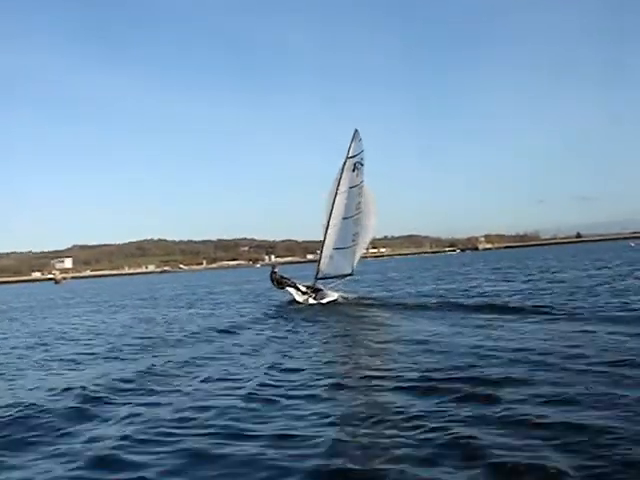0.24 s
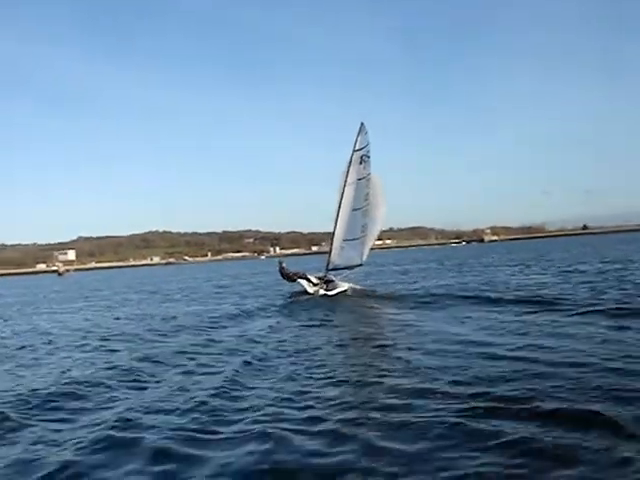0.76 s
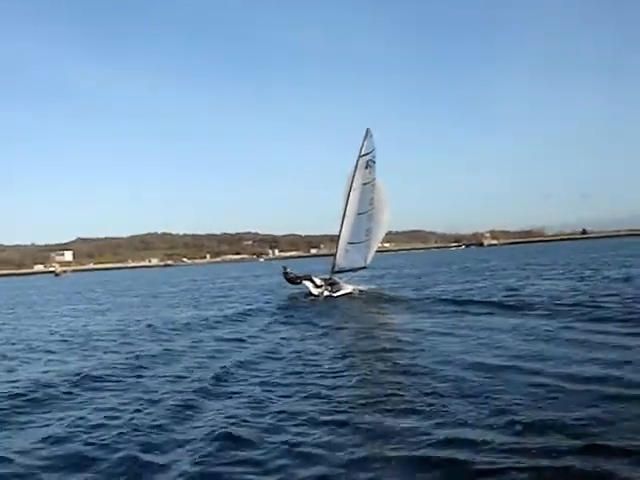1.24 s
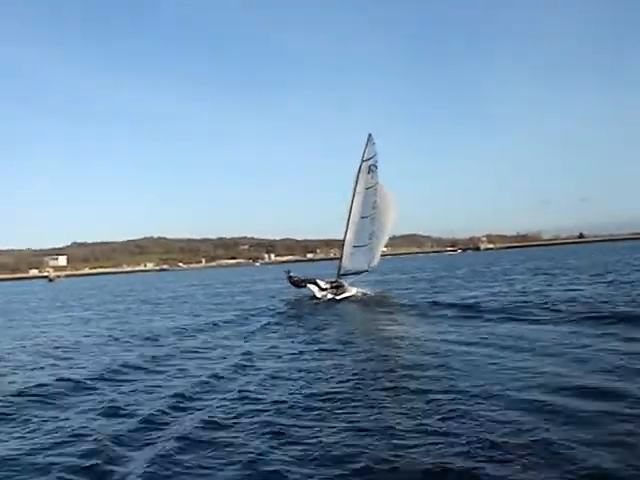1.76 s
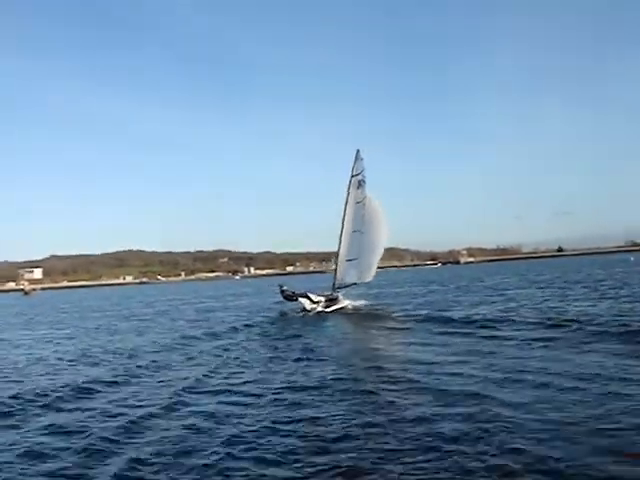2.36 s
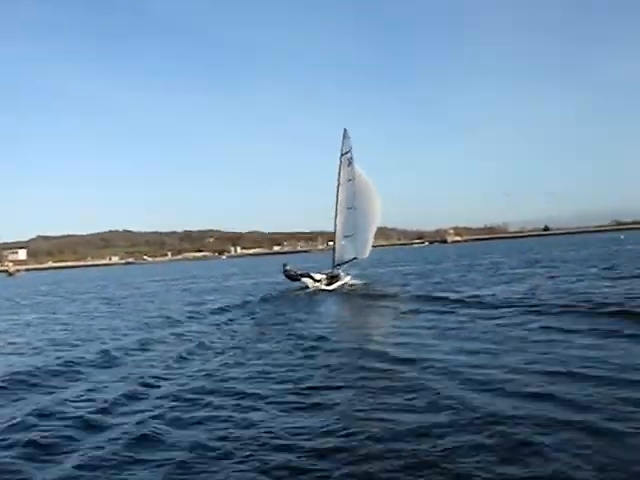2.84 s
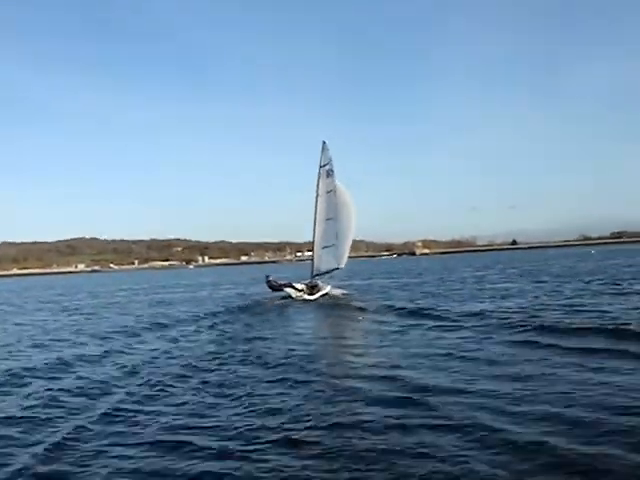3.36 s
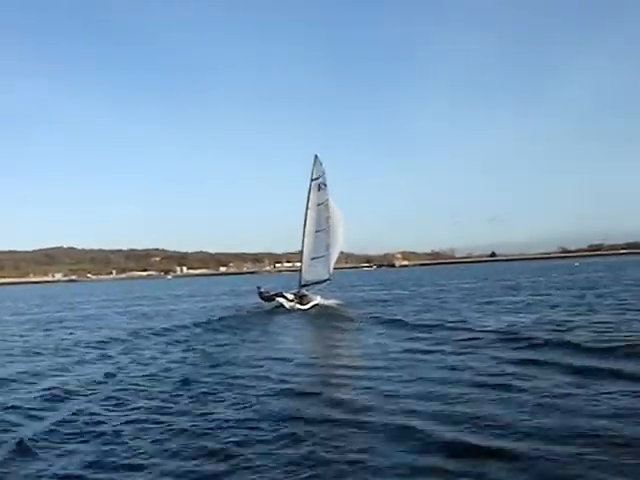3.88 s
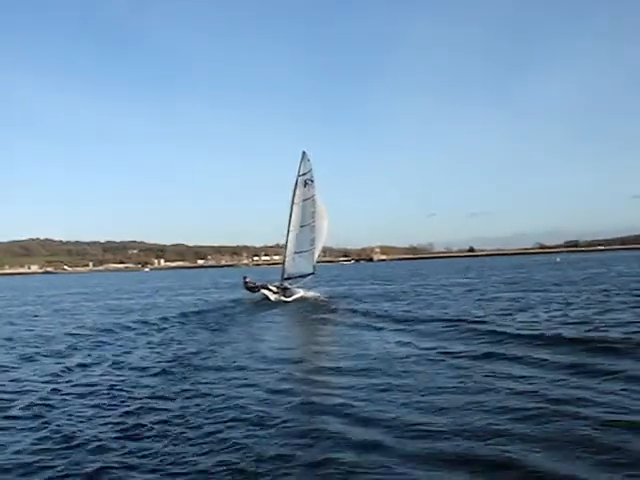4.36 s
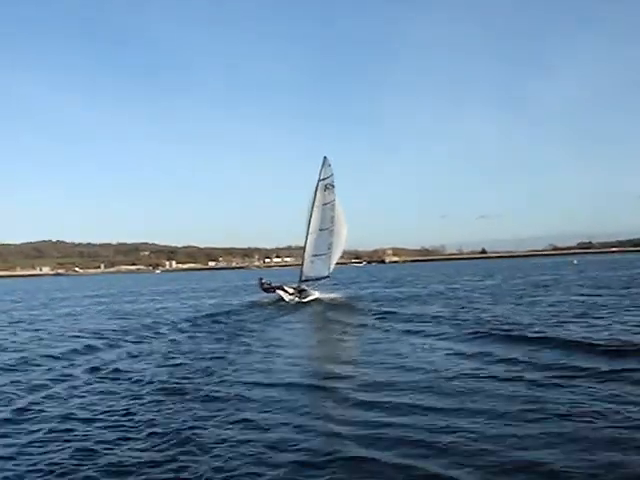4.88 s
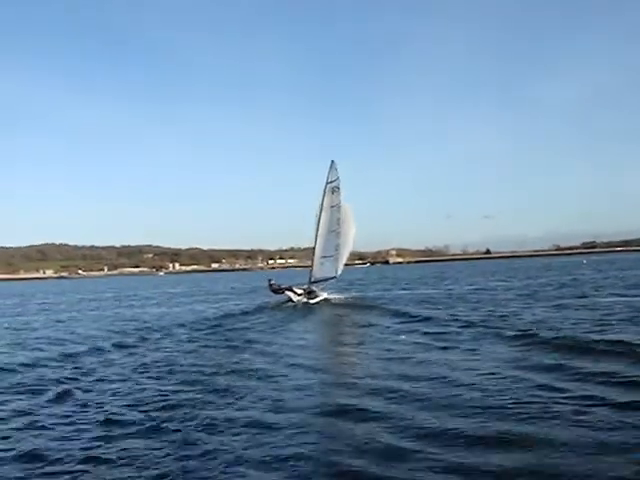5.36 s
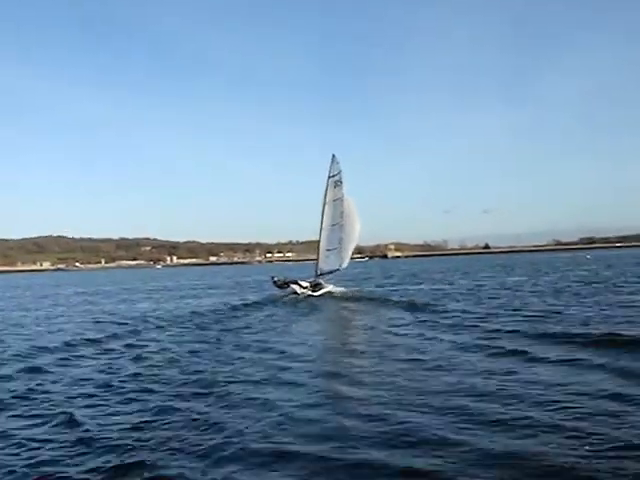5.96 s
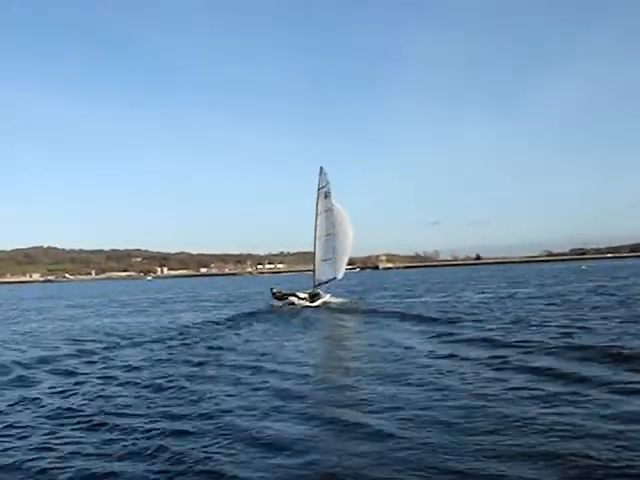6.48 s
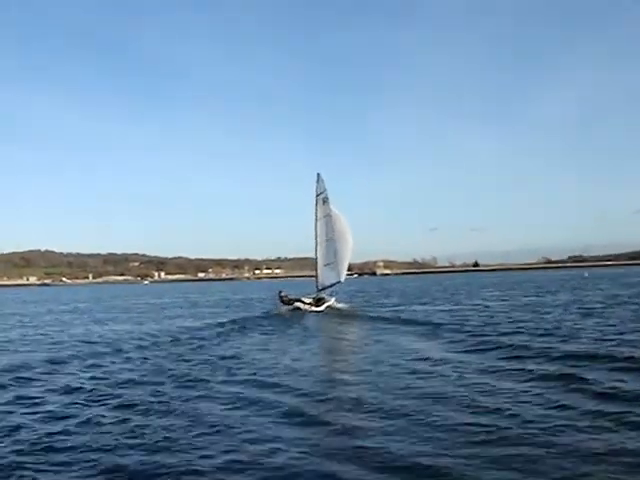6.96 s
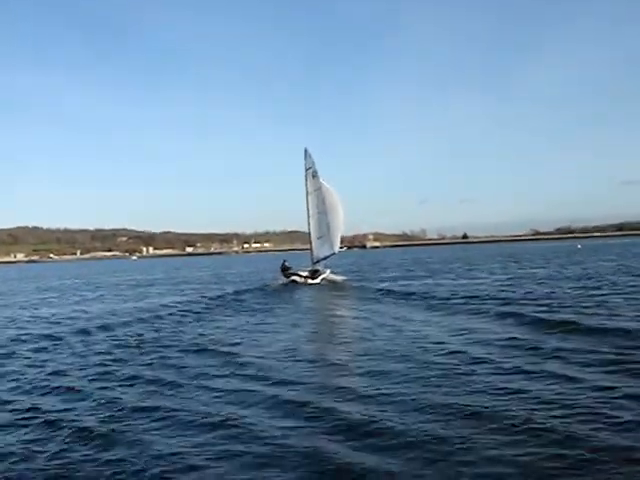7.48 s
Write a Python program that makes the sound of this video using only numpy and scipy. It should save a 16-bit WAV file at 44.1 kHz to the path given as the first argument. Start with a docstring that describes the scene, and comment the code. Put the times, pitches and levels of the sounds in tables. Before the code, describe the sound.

From on board a small boat in open air, an outboard motor drones throughout, a low hum near 116 Hz with a strong boom three times higher and a soft, regular clatter of knocks and puffs. Wake water runs alongside without pause: dull sloshing, mid-toned churning with bubbles, and bright hissing spray with tiny droplets. Small waves lift it repeatedly, most sharply around 1.3 and 1.9 seconds. Low, lumpy wind gusts buffet the microphone, with short thumps near 1.2, 1.6 to 1.7, 2.2, 3.7 and 4.7 seconds. From about 2.1 to 2.7 the throttle opens a little and the hum climbs under a semitone to about 121 Hz, then holds. Around 6.1 to 6.7 it rises slightly again and the boom strengthens. The wind is calmer and the spray softer toward the end, at about 7.7 seconds, with the motor still running.

```python
"""A motor hums through the hull of a small boat on a lake, heard from on board; its throttle opens a little, twice.
The four-stroke outboard is sines locked to its cycle, plus a repeating pattern of knocks and puffs of noise.
The wake rushes and fizzes alongside: shaped noise and ringing droplets, lifted by each breaking wave.
Wind buffets the microphone: low, lumpy noise that swells in gusts, with short thumps from single eddies."""
import sys
import numpy as np
from scipy import signal
from scipy.fft import rfft, irfft, next_fast_len
from scipy.io import wavfile
from scipy.ndimage import uniform_filter1d, map_coordinates

SR = 44100
rng = np.random.default_rng(int(sys.argv[2]) if len(sys.argv) > 2 else 0)


def wav_out(sig):
    """Save sig, one row per channel (or a flat mono array), as 16-bit PCM at SR to the path in sys.argv[1]."""
    wavfile.write(sys.argv[1], SR, np.round(np.clip(np.atleast_2d(sig).T, -1, 1) * 32767).astype(np.int16))


N = 340452  # length in samples


def amp(db):
    """Decibels to gain."""
    return np.exp(np.asarray(db) * np.log(10) / 20)


def unit(x):
    """x at rms 1."""
    return x / np.sqrt(np.mean(x ** 2) + 1e-20)


def curves(rows):
    """One value per sample for each column after the time."""
    time_s, *columns = np.transpose(rows)
    return [np.interp(np.arange(N) / SR, time_s, column) for column in columns]


def wobble(rate):
    """A smooth random curve, rate knots a second."""
    knots = rng.standard_normal(int(N * rate / SR) + 4)
    coarse = np.linspace(0, N, N // 128)
    smooth = map_coordinates(knots, [coarse * rate / SR])
    return np.interp(np.arange(N), coarse, smooth)


def swells(rows, steady_db):
    """Level in dB of a steady flow plus bell-shaped swells, each at half power at the ends of its length."""
    t = np.arange(N) / SR
    power = amp(steady_db) ** 2
    for peak_s, length_s, level_db in rows:
        halvings = np.minimum((2 * (t - peak_s) / length_s) ** 2, 20)
        power = power + amp(level_db) ** 2 * .5 ** halvings
    return 10 * np.log10(power)


def filtered(x, response):
    """x times a response of frequency."""
    padded = next_fast_len(N + SR // 4)
    gain = response(np.fft.rfftfreq(padded, 1 / SR))
    return irfft(rfft(x, padded) * gain, padded)[:N]


def coloured(x, spectrum):
    """x shaped by (Hz, dB) points on a log axis, at rms 1."""
    point_hz, point_db = np.transpose(spectrum)
    return unit(filtered(x, lambda hz: amp(np.interp(np.log(hz + 1), np.log(point_hz), point_db))))


def rush(spectrum, patchy_db):
    """Noise of rms 1 whose gain varies in patches over time and frequency."""
    grains = signal.stft(rng.standard_normal(N), nperseg=512)[2]
    field = rng.standard_normal(grains.shape)
    for axis in (0, 1):  # blur across frequency, then time
        field = uniform_filter1d(field, size=12, axis=axis)
    patchy = signal.istft(grains * amp(patchy_db * unit(field)), nperseg=512)[1][:N]
    return coloured(patchy, spectrum)


def wind():
    """Gusts of lumpy turbulence at the microphone, with a few harder, brighter eddies."""
    # gusts on the microphone: peak_s, length_s, level_db
    gust_rows = [(.05, 0.092, -22), (.78, .22, -23), (1.19, 0.21, -22.5), (1.48, .1, -21),
                 (1.73, 0.11, -20), (2.01, .2, -21.5), (2.52, 0.33, -26.5), (3.36, 0.22, -26),
                 (3.8, 0.24, -22), (4.28, 0.25, -25), (4.75, 0.19, -22), (5.29, 0.11, -24),
                 (5.7, 0.19, -25), (7.14, 0.069, -27.5)]
    # single eddies that thump the microphone: centre_s, level_db, half_length_s
    eddy_rows = [(1.155, -21, .012), (1.571, -15, .007), (1.705, -18.5, .012), (1.742, -16, .007),
                 (2.178, -22, .009), (3.655, -23, .01), (4.65, -22, .009), (4.712, -22, .007),
                 (4.765, -18, .016)]
    # tone of the buffeting: frequency_hz, density_db (per Hz)
    buffet_spectrum = [(20, -17), (40, -14.5), (80, -6.5), (140, -1), (250, 0), (400, -6), (700, -16.5),
                       (1500, -27), (5000, -71)]
    # tone of the eddies: frequency_hz, density_db (per Hz)
    thump_spectrum = [(30, -22), (100, -5), (300, 0), (700, -4), (1200, -20), (5000, -70)]
    breeze_db, breeze_db_per_s = -26.5, -0.64  # buffeting between gusts at the start; it slowly eases

    t = np.arange(N) / SR
    buffet_db = swells(gust_rows, breeze_db + breeze_db_per_s * t)
    buffet = amp(buffet_db + 1.46 * wobble(40)) * rush(buffet_spectrum, patchy_db=2)
    eddies = np.zeros(N)
    for centre_s, level_db, half_s in eddy_rows:
        near = np.abs(t - centre_s) < .1
        eddies[near] += amp(level_db) * np.exp(-.5 * ((t[near] - centre_s) / half_s) ** 2)
    return buffet + eddies * coloured(rng.standard_normal(N), thump_spectrum)


def droplets(centre_hz, cycles, count):
    """Drops and bursting bubbles: tiny damped rings of random pitch and size."""
    chance = rng.random((count, 3))
    start = (chance[:, :1] * N).astype(int)
    hz = centre_hz * 2 ** (3 * (chance[:, 1:2] - .5))  # three octaves around the centre
    size = amp(-4 * np.log(chance[:, 2:] + 0.019))  # many small, few large
    k = np.arange(SR // 200)  # each ring is cut at 5 ms
    decay = np.exp(-hz * k / SR / cycles)
    rings = size * np.sin(2 * np.pi * hz * k / SR) * decay
    return unit(np.bincount((start + k).ravel(), rings.ravel(), N)[:N])


def slosh(level_db, lift_db):
    """Water sloshes low along the hull: dull noise that each wave lifts only slightly."""
    # tone of the sloshing: frequency_hz, density_db (per Hz)
    slosh_spectrum = [(20, -27), (70, -6.5), (200, -8), (450, 1.5), (650, 0.5), (850, -3), (1200, -14),
                      (3000, -41)]
    follows = 0.11  # dB gained for each dB that a wave adds to the spray
    return amp(level_db + follows * lift_db + 0.92 * wobble(14)) * rush(slosh_spectrum, patchy_db=0.5)


def churn(level_db, lift_db, ripples):
    """Water churns behind the hull: patchy noise with ringing bubbles in it."""
    # tone of the churning: frequency_hz, density_db (per Hz)
    churn_spectrum = [(100, -27.5), (600, -9.5), (950, -1), (1800, -3), (2300, -7), (3500, -13),
                      (6000, -26.5), (10000, -54)]
    follows = 0.53  # dB gained for each dB that a wave adds to the spray
    bubbles = amp(-6) * coloured(droplets(centre_hz=1822, cycles=2.4, count=5000), churn_spectrum)
    water = rush(churn_spectrum, patchy_db=1.3) + bubbles
    return amp(level_db + follows * lift_db + 0.49 * ripples) * water


def spray(level_db, ripples):
    """Spray is a bright hiss with ringing droplets in it."""
    # tone of the spray: frequency_hz, density_db (per Hz)
    spray_spectrum = [(600, -22), (2000, -0.5), (3000, 1), (4000, -2), (5200, -2), (6300, -7.5),
                      (7500, -11), (10000, -16)]
    drops = amp(-5.5) * coloured(droplets(centre_hz=4430, cycles=2.4, count=7000), spray_spectrum)
    return amp(level_db + 0.84 * ripples) * (rush(spray_spectrum, patchy_db=1.1) + drops)


def wake():
    """Each wave that breaks along the hull lifts sloshing, churning and spray by different amounts."""
    # waves that break along the hull: crest_s, length_s, spray_db
    wave_rows = [(.3, 0.22, -35.5), (.64, 0.35, -34.5), (.97, 0.14, -33.5), (1.335, 0.089, -30.5),
                 (1.9, 0.12, -32.5), (2.25, .34, -35), (2.82, .32, -35), (3.2, 0.35, -37.5),
                 (3.76, 0.23, -34), (4.04, 0.2, -33.5), (4.35, .22, -33.5), (4.72, 0.32, -35.5),
                 (5.22, 0.41, -35), (5.86, .36, -33.5), (6.62, 0.44, -38.5), (7.02, 0.2, -36),
                 (7.36, .16, -37), (7.72, .16, -38)]
    # slow drift of the wake between waves: time_s, slosh_db, churn_db
    drift_rows = [(0, -26, -25.5), (1.3, -27.5, -27), (2.5, -25.5, -26.5), (3.5, -27, -27.5),
                  (4.65, -24.5, -28), (5.7, -24.8, -27), (6.3, -26, -28), (7.72, -29, -28)]
    steady_spray_db = -35.5  # between waves

    slosh_db, churn_db = curves(drift_rows)
    spray_db = swells(wave_rows, steady_spray_db)
    lift_db = spray_db - steady_spray_db
    ripples = unit(wobble(22) + wobble(70))  # each small ripple lifts churn and spray together
    return slosh(slosh_db, lift_db) + churn(churn_db, lift_db, ripples) + spray(spray_db, ripples)


def clatter(cycle):
    """Valves and gears repeat one pattern of knocks each cycle; every firing adds a puff of noise."""
    # tone of knocks and puffs: frequency_hz, gain_db
    clatter_spectrum = [(200, -31), (550, -10.5), (900, -1.5), (1500, -1), (3000, -9.5), (6000, -13),
                        (10000, -26)]
    pattern = rng.standard_normal(1024)
    knocks = np.interp(cycle % 1, np.linspace(0, 1, len(pattern)), pattern)
    puffs = (1 + np.cos(2 * np.pi * 4 * cycle)) * rng.standard_normal(N)
    return amp(-34.5) * coloured(knocks, clatter_spectrum) + amp(-35) * coloured(puffs, clatter_spectrum)


def tone(cycle, order):
    """A sine of rms 1 locked to a multiple of the engine cycle."""
    return np.sqrt(2) * np.sin(2 * np.pi * (order * cycle + rng.random()))


def hum(cycle, firing_hz):
    """The firing tone, its booming third harmonic and the weaker orders of the hull, all set by the speed."""
    # slow, cruise and fast throttle settings: firing_hz
    throttle_hz = [115.8, 120.9, 122.7]
    # orders that hull and cowl pick out: order (multiple of the four-stroke cycle), slow_db, cruise_db, fast_db
    order_rows = [ (7, -45, -35, -34), (8, -36, -31.5, -31.5), (9, -37, -47, -44), (10, -50, -43, -44),
                  (11, -48, -38, -36), (13, -32.5, -52, -52), (16, -38, -34, -34), (18, -39, -49, -48),
                  (19, -54, -37, -33), (20, -39, -48, -40), (21, -45, -43, -44), (22, -54, -41, -46),
                  (25, -54, -41, -36), (27, -38, -46, -49), (28, -44, -54, -56), (33, -52, -46, -46),
                  (36, -54, -54, -46), (41, -54, -49, -44), (42, -56, -45, -54), (52, -50, -48, -44)]
    # speeds at which the boom level is set: firing_hz
    boom_hz = [116.2, 117.4, 121.05, 121.7]
    # boom at each of these speeds, weaker at cruise: level_db
    boom_db = [-20, -27.5, -25, -19.5]
    cruise_db, db_per_hz = -21.5, 0.46  # the firing tone at cruise; it grows with speed

    firing_db = cruise_db + db_per_hz * (firing_hz - throttle_hz[1])
    firing = amp(firing_db + 0.64 * wobble(9)) * tone(cycle, order=4)
    boom = amp(np.interp(firing_hz, boom_hz, boom_db) + 0.96 * wobble(11)) * tone(cycle, order=12)
    hull = np.zeros(N)
    for order, *setting_db in order_rows:
        level_db = np.interp(firing_hz, throttle_hz, setting_db)
        hull += amp(level_db + 1.17 * wobble(4)) * tone(cycle, round(order))
    return firing + boom + hull


def outboard():
    """Four firings make one cycle of the engine, whose speed wanders very slightly."""
    # engine speed as the throttle opens, before the slight wander: time_s, firing_hz
    motor_rows = [(0, 115.5), (1.4, 115.75), (2.08, 116.3), (2.25, 118.2), (2.7, 120.65), (6.05, 121.05),
                  (6.25, 121.9), (6.7, 122.7), (7.72, 123.3)]
    firing_hz, = curves(motor_rows)
    cycle = np.cumsum(firing_hz * (1 + .0007 * wobble(12))) / SR / 4
    return hum(cycle, firing_hz) + clatter(cycle)


def scene():
    """Wind, water and motor at one microphone."""
    return (wind() + wake() + outboard())[None]


def record(dry):
    """The microphone flattens positive peaks sooner than negative ones; nothing is kept above the band limit."""
    top_hz = 10080
    ceiling = np.where(dry[0] > 0, .46, .8)
    rounded = dry[0] / (1 + np.abs(dry[0] / ceiling) ** 8) ** (1 / 8)
    return filtered(rounded, lambda hz: hz < top_hz)[None]


dry = scene()
out = record(dry)
wav_out(out)
```